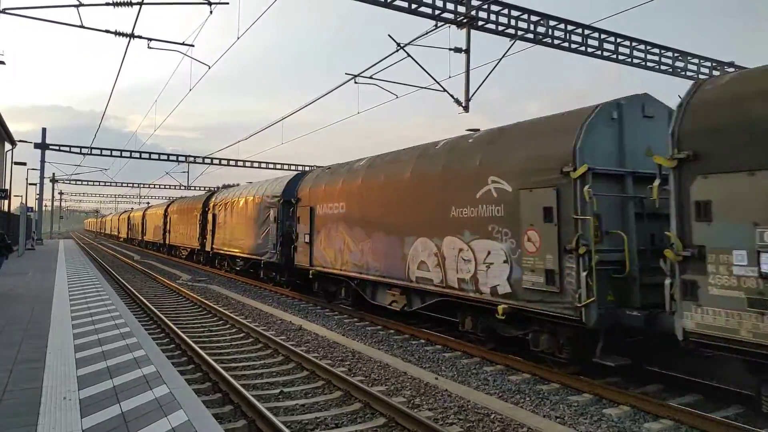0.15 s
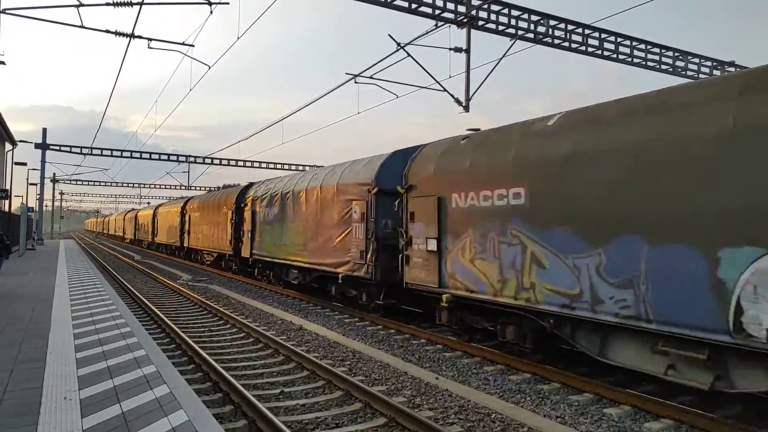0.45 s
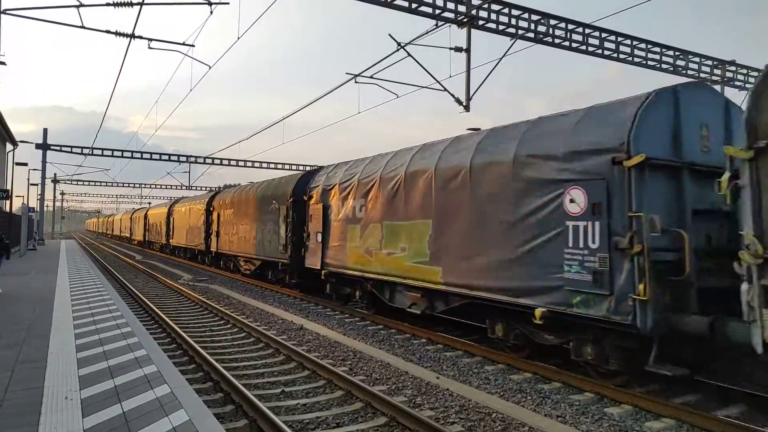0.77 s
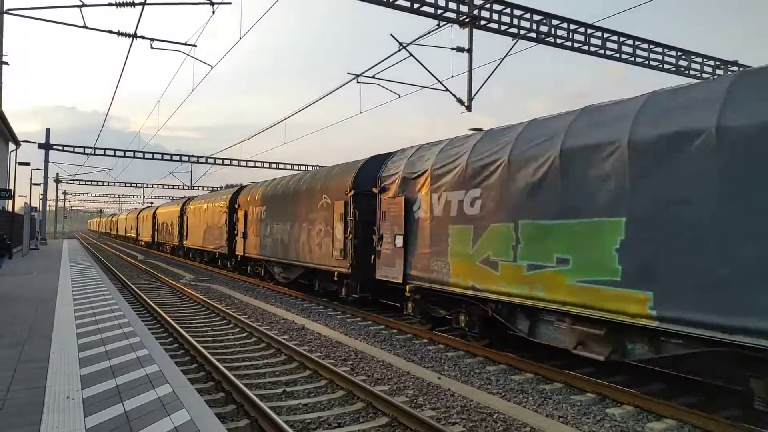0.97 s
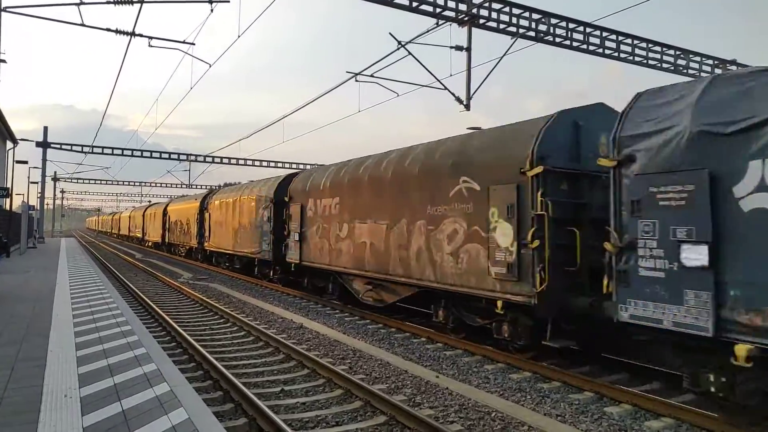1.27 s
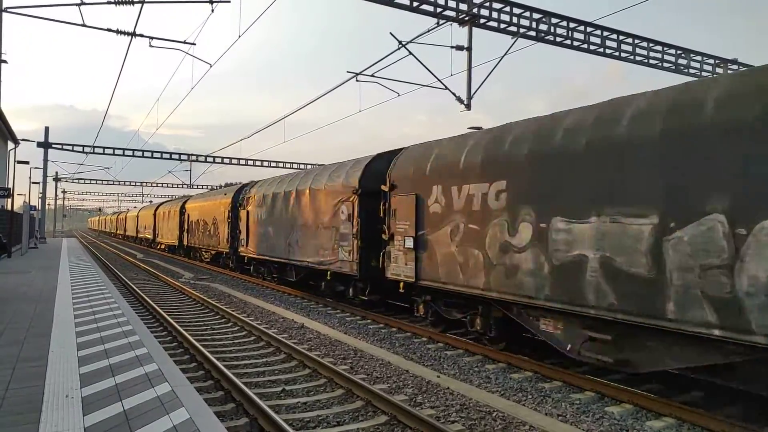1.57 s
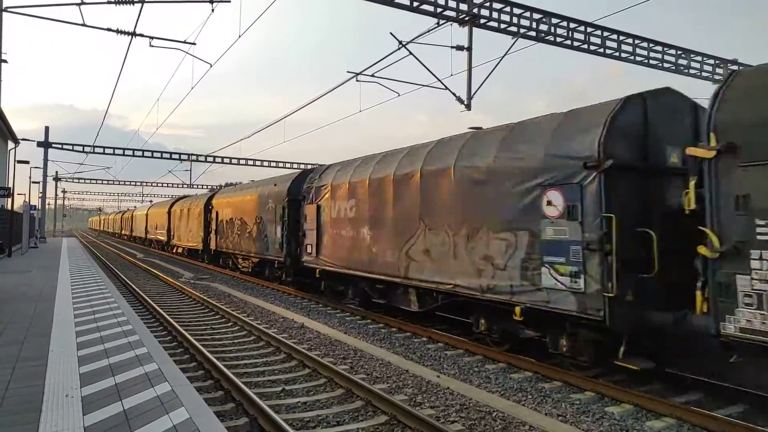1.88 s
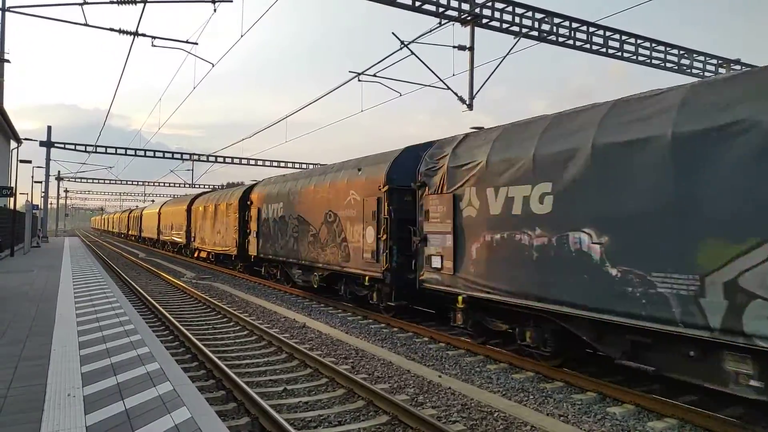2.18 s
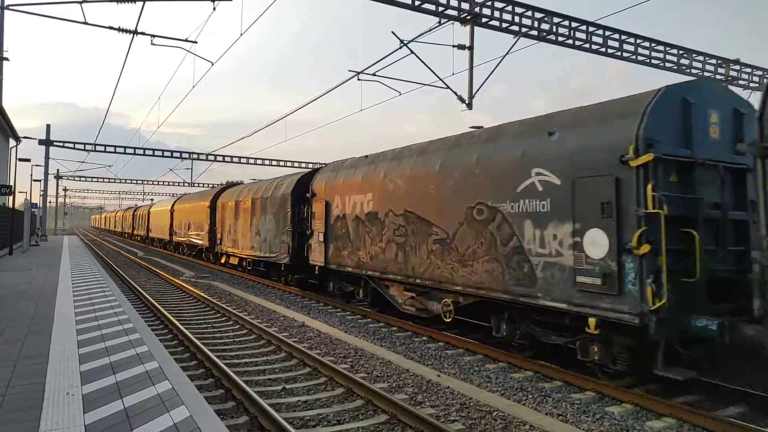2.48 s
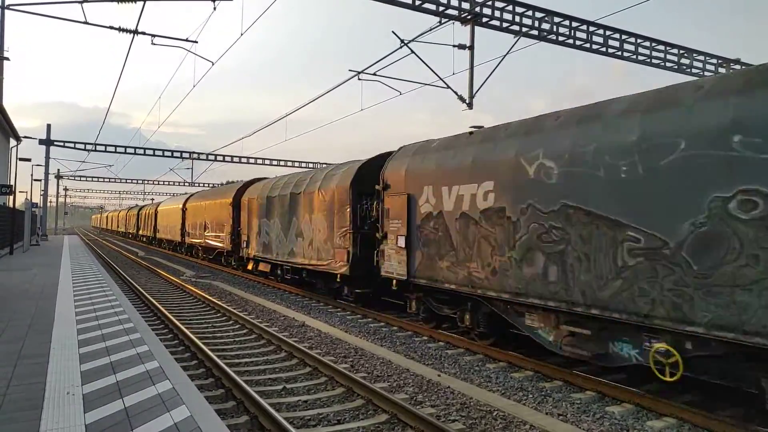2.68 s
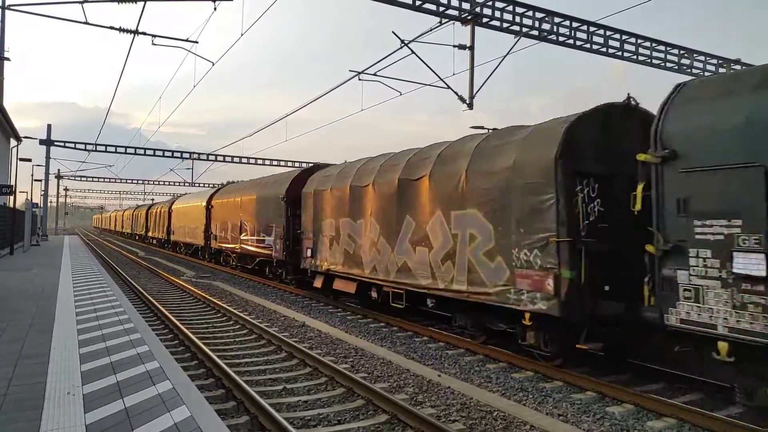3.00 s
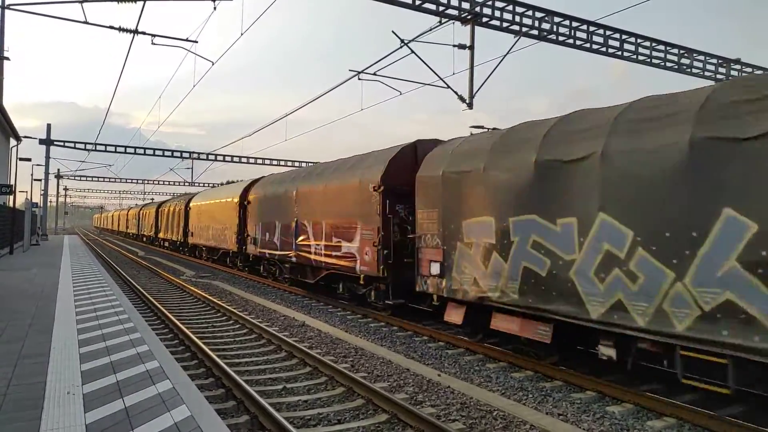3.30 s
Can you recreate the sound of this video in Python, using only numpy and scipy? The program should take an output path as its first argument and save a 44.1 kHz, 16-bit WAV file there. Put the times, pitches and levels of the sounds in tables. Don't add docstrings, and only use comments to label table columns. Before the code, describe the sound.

A freight train rolls past close by, rumbling densely, with a flat wheel banging rhythmically mid-pass.

```python
import sys
import numpy as np
from scipy import signal
from scipy.fft import rfft, irfft
from scipy.io import wavfile
from scipy.ndimage import uniform_filter1d

SR = 44100
rng = np.random.default_rng(int(sys.argv[2]) if len(sys.argv) > 2 else 0)


def volts(x):
    e = np.asarray(x, float) / 20
    return 10 ** e


def log_audio(samples):
    frames = np.atleast_2d(samples).T
    limited = np.clip(frames, -1, 1)
    pcm = np.round(limited * 32767).astype(np.int16)
    wavfile.write(sys.argv[1], SR, pcm)


N = 152145

# time in seconds, rolling level in dB, weight of the wagons on the rumble in dB.
ROUGHNESS = [
    (0.0, -22.5, -3.5),
    (0.66, -23, -3),
    (1.44, -21, -3.5),
    (1.69, -22.5, -6.5),
    (1.83, -22.5, -5),
    (2.7, -23.5, -6),
    (3.45, -23.5, -4),
]
# frequency in Hz, level per Hz in dB.
TRACK_COLOUR = [(25, -7.5), (60, -6.5), (105, -5.5), (200, 3), (400, -2.5), (900, -10), (2000, -11.5),
                (3000, -16.5)]
TRACK_DB, RUMBLE_FOLLOWS, RUMBLE_TOP_HZ = 5, 0.74, 680
PATCHY_DB, SHARED_DB = 2, .5
# frequency in Hz, width in Hz, level above the rolling in dB.
TRACK_RINGS = [(88.8, 6.8, -8), (163.4, 14, 0.5), (229.8, 9.1, 0.5), (300.6, 43, -15.5), (335.5, 7.2, -4.5),
               (2042, 55, -14), (2114, 130, -7.5), (4216, 150, -14)]

# time in seconds, level in dB.
SINGING_LEVEL = [(0.0, -21), (0.04, -23), (0.14, -51), (0.17, -26), (0.25, -45), (0.36, -26), (0.52, -37),
                 (0.93, -27), (0.98, -34.5), (1.04, -29.5), (1.82, -42.5), (1.86, -35), (2.15, -38.5),
                 (2.45, -32), (2.58, -54), (2.73, -32.5), (2.81, -38.5), (3.45, -40.5)]
SINGING_HZ, SINGING_WANDER_HZ = 510.6, 2.5

# start in seconds, knock peak in dB, thump per mode in dB, crash in dB, hiss in dB.
FLAT_LANDINGS = [(.004, -10, -18, -38, -20.5), (.394, -14, -24, -31.5, -28), (0.793, -13, -21, -23, -23),
                 (.914, -25, -19.5, -22, -23), (1.046, -7, -22, -17, -25),
                 (1.173, -9.5, -21.5, -14.5, -17.5), (1.304, 2, -14, -14, -19.5),
                 (1.438, -8, -18, -15.5, -12.5), (1.57, -18, -16, -23.5, -18),
                 (1.703, -27, -18, -24, -26.5), (1.85, -5, -20, -22, -22), (1.979, -32, -22, -23, -34),
                 (2.109, -38, -28, -34, -22), (2.566, -12.5, -29.5, -38, -37)]
KNOCK_LOSS_DB, KNOCK_HZ, KNOCK_WIDTH_HZ = -8, 610, 400
# rise in seconds, 60 dB decay in seconds.
SHAKE_TIMES = [
    (.004, .4),
    (.015, .45),
]
# frequency in Hz, level in dB, 60 dB decay in seconds.
THUMP_MODES = [(134.9, -13, 0.91), (161.8, -8, 0.45), (191.5, -0.5, 0.45), (229.2, -5, 0.71),
               (247, -3, 0.4), (292, -6.5, 0.34), (337, -16.5, 0.75), (399.3, -10, 0.29)]
SPREAD_S = 0.018
# frequency in Hz, level per Hz in dB.
CRASH_COLOUR = [(300, -12), (550, -3.5), (900, -4), (1500, -7.5), (2200, -9), (3200, -14)]
# frequency in Hz, level per Hz in dB.
HISS_COLOUR = [(2500, -16), (4500, -6), (7500, 0), (10000, 2), (13800, 4)]

# start in seconds, length in seconds, frequency in Hz, level in dB.
FRAME_BOOMS = [(0.423, 0.16, 182.4, -29), (0.653, 0.16, 158.9, -27.5), (0.873, 0.064, 244.5, -27),
               (1.036, 0.039, 176, -22.5), (1.2, 0.068, 182, -23.5), (1.32, .2, 171, -19),
               (1.308, 0.043, 250, -17), (1.52, 0.048, 254.2, -23), (1.592, .05, 360, -26.5),
               (1.2, 0.075, 380, -28.5), (1.342, 0.033, 310, -25), (1.064, 0.03, 410, -28.5),
               (1.7, 0.22, 232, -22), (1.71, 0.032, 337, -19.5), (1.732, 0.035, 140, -22),
               (1.846, 0.13, 150.3, -26), (1.856, 0.031, 343.5, -23.5), (1.988, 0.082, 226.3, -25.5),
               (2.2, 0.16, 226.5, -28.5), (2.415, 0.14, 222, -33), (2.628, 0.12, 208, -35),
               (3.07, .12, 223, -27)]
BOOM_RISE_S, BOOM_FALL_S, BOOM_WANDER_HZ = .012, .03, 4

# middle in seconds, length in seconds, frequency in Hz, level in dB.
FLANGE_SQUEALS = [
    (.87, .06, 11300, -28),
    (1.15, .28, 11250, -30),
    (1.33, .1, 13900, -25),
    (1.46, .12, 13600, -24),
    (1.6, .1, 13100, -23),
    (1.6, .07, 11000, -30),
    (1.6, .08, 7700, -24),
]

# frequency in Hz, share of power in step, share that reaches the left port late.
PORT_LIKENESS = [(60, .985, 0), (210, .92, .02), (330, .74, .1), (500, .48, .2), (800, .08, .35),
                 (1200, 0, .4), (2200, 0, .27), (5000, 0, .15)]
LAG_S = 0.000463
# frequency in Hz, left over right in dB.
PORT_BALANCE = [(60, -.2), (210, .5), (500, 2.8), (1800, 3.8), (3000, 0)]
# frequency in Hz, gain in dB.
LEFT_PORT = [(3000, 1.5), (4300, -0.5), (5000, 2), (7000, 2), (8200, 7), (9800, -11), (11200, -19.5),
             (15500, -29)]
# frequency in Hz, gain in dB.
RIGHT_PORT = [(3000, 1), (4300, 0.5), (4900, 3), (6500, 2), (7400, 8.5), (9000, -13), (11000, -31),
              (15500, -33.5)]
# frequency in Hz, width in Hz, left gain in dB, right gain in dB.
CASING_DIPS = [(3783, 160, -4, -7.5), (4876, 310, -2, -6), (6820, 150, -3, -1.5), (8940, 59, -6, -4),
               (9470, 150, 0, -1), (10630, 330, -9.5, -5.5)]
CLIP_TOP = .93

# frequency in Hz, step in dB.
ROUNDING_STEP = [(100, -38), (300, -30), (900, -26), (1200, -24), (4800, -24), (5600, -25.5), (8200, -26.5),
                 (8800, -32), (10600, -33), (11200, -38), (13000, -42), (15700, -45)]
STEP_FOLLOWS, STEP_WANDER_DB = .5, 1.5
# frequency in Hz, threshold in spreads of a wandering
WEAK_THRESHOLD = [(400, -12), (800, -2.4), (1150, -1.8), (2000, -2), (3000, -.8), (4900, -.55),
                  (7300, -.95), (8800, -.7), (10000, 0), (12500, -.1), (14000, 0), (15700, 1.8)]


def rms_one(x):
    return x / np.sqrt(np.mean(x ** 2) + 1e-20)


def in_time(rows):
    s, *columns = np.transpose(rows)
    return [np.interp(np.arange(N) / SR, s, c) for c in columns]


def at_hz(points, hz, column=1):
    points = np.array(points)
    return np.interp(np.log(hz), np.log(points[:, 0]), points[:, column])


def bins():
    return np.maximum(np.fft.rfftfreq(N, 1 / SR), 1)


def drift(rate_hz):
    r = np.exp(-80 * np.pi * rate_hz / SR)
    slow = signal.lfilter([1], [1, -2 * r, r * r], rng.standard_normal(N // 40 + 2002))
    slow = rms_one(slow[2000:])
    return np.interp(np.arange(N) / 40, np.arange(len(slow)), slow)


def ports():
    hz = bins()
    same, late, left, right = rfft(rng.standard_normal((4, N)))
    in_step = np.clip(at_hz(PORT_LIKENESS, hz, column=1), 0, 1)
    lagging = np.clip(at_hz(PORT_LIKENESS, hz, column=2), 0, 1)
    unrelated = np.clip(1 - in_step - lagging, 0, 1)
    delay = np.array([np.exp(-2j * np.pi * hz * LAG_S), hz ** 0])
    both = np.sqrt(in_step) * same + np.sqrt(lagging) * late * delay
    return both + np.sqrt(unrelated) * np.array([left, right])


def coloured(spectrum):
    points = [(spectrum[0][0] / 2, -50), *spectrum, (spectrum[-1][0] * 2, -50)]
    return rms_one(irfft(ports() * volts(at_hz(points, bins())), N))


def resonance(x, hz, width_hz):
    r = np.exp(-np.pi * width_hz / SR)
    poles = [1, -2 * r * np.cos(2 * np.pi * hz / SR), r * r]
    return signal.lfilter([(1 - r * r) / 2, 0, (r * r - 1) / 2], poles, x)


def tone(hz, wander_hz):
    pitch_hz = hz + wander_hz * drift(8)
    return np.sqrt(2) * np.sin(2 * np.pi * np.cumsum(pitch_hz) / SR)


def rolling():
    level_db, weight_db = in_time(ROUGHNESS)
    swing_db = level_db - level_db.mean()
    half_octave = np.log2(bins() / 20) * 2
    body = ports() * volts(at_hz(TRACK_COLOUR, bins()))
    body = body / np.std(irfft(body * (bins() < 3000), N))
    together, out = drift(16.0), 0
    for k in range(20):
        share = np.cos(np.pi / 2 * np.clip(half_octave - k, -1, 1)) ** 2
        band_hz = 20 * 2 ** (k / 2)
        low = 1 / (1 + (band_hz / RUMBLE_TOP_HZ) ** 2)
        gain_db = swing_db * (1 - low + low * RUMBLE_FOLLOWS) + low * weight_db
        gain_db = gain_db + SHARED_DB * together + PATCHY_DB * (.4 + .6 * low) * drift(7.2)
        out = out + volts(gain_db) * irfft(body * share, N)
    for hz, width_hz, db in TRACK_RINGS:
        heavy_db = weight_db * (hz < 1000) + swing_db + 0.83 * drift(2.6)
        ring = rms_one(resonance(irfft(ports(), N), hz, width_hz))
        out = out + volts(db - 10.5 + heavy_db) * ring
    return volts(level_db.mean() + TRACK_DB) * out


def singing_wheel():
    level_db = in_time(SINGING_LEVEL)[0] - 1.5
    return volts(level_db) * tone(SINGING_HZ, SINGING_WANDER_HZ) * volts([[1], [-1]])


def shaken_wagon(rows):
    age = np.maximum(np.arange(N) / SR - rows[:, :1], 0)
    out = 0
    for column, colour, (rise_s, t60) in zip((3, 4), (CRASH_COLOUR, HISS_COLOUR), SHAKE_TIMES):
        shake = volts(rows[:, column, None] - 60 * age / t60) * (1 - np.exp(-age / rise_s))
        out = out + np.sqrt(np.sum(shake ** 2, axis=0)) * coloured(colour)
    return out


def struck_track(rows, at):
    chance = rng.standard_normal((len(rows), len(THUMP_MODES)))
    out = 0
    for k, (hz, db, t60) in enumerate(THUMP_MODES):
        late = int(SPREAD_S * SR * (k * 3 % 8 / 8))
        blows = np.full(N, 1e-18)
        blows[at + late] = volts(rows[:, 2] + db + 1.9 * chance[:, k]) * (-1) ** k
        r, w = volts(-60 / (t60 * SR)), 2 * np.pi * hz / SR
        out = out + signal.lfilter([0, np.sin(w)], [1, -2 * r * np.cos(w), r * r], blows)
    return out


def wheel_knock(rows, at):
    knock = np.full(N, 1e-18)
    knock[at] = volts(rows[:, 1] + KNOCK_LOSS_DB)
    for _ in range(2):
        knock = resonance(knock, KNOCK_HZ, KNOCK_WIDTH_HZ)
    knock = knock * SR / KNOCK_WIDTH_HZ
    return np.array([np.roll(knock, int(LAG_S * SR)), knock])


def flat_wheel():
    rows = np.array(FLAT_LANDINGS)
    at = (rows[:, 0] * SR).astype(int)
    return shaken_wagon(rows) + struck_track(rows, at) + wheel_knock(rows, at)


def booms():
    t, out = np.arange(N) / SR, 0
    for s, length, hz, db in FRAME_BOOMS:
        rise = 1 - np.exp(-np.maximum(t - s, 0) / BOOM_RISE_S)
        fall = np.exp(-np.maximum(t - s - length, 0) / BOOM_FALL_S)
        out = out + volts(db + 1.2 * drift(10)) * rise * fall * tone(hz, BOOM_WANDER_HZ)
    return out


def squeals():
    t, out = np.arange(N) / SR, 0
    for middle, length, hz, db in FLANGE_SQUEALS:
        swell = np.exp(-((t - middle) / length * 2) ** 2)
        rub = resonance(resonance(rng.standard_normal(N), hz, 320), hz, 350)
        out = out + volts(db) * swell * rms_one(rub)
    return out * volts([[0], [-6]])


def scene():
    return rolling() + singing_wheel() + flat_wheel() + booms() + squeals()


def blur(x, size):
    return uniform_filter1d(uniform_filter1d(x, size=size[0], axis=-2), size=size[1], axis=-1)


def weak(z):
    field = 0
    for size in ((3, 4), (3, 10)):
        field = field + rms_one(blur(rng.standard_normal(z.shape[1:]), size)) / np.sqrt(2)
    near = blur(z ** 2, (2, 5)) + 1e-14
    around = blur(np.mean(z ** 2, axis=0), (7, 57)) + 1e-14
    below_db = 10 * np.log10(near / around)
    return field + below_db / 4 < at_hz(WEAK_THRESHOLD, (np.arange(1024) + .5) * SR / 2048)


def round_coarse(x):
    n, k = np.arange(2048) + .5, np.arange(1024) + .5
    basis = np.cos(np.pi / 1024 * np.outer(n + 512, k)) / np.sqrt(512)
    turn = np.array([[1, 1], [1, -1]])
    hops = np.pad(turn @ x / 2, ((0, 0), (1496, 2048 - (N + 472) % 1024))).reshape(2, -1, 1024)
    bell = np.kaiser(1025, 4 * np.pi)
    slopes = np.array([np.sin(np.pi * n[:1024] / 2048), np.sqrt(np.cumsum(bell)[:-1] / bell.sum())])
    slope = slopes[1 * (uniform_filter1d(rng.random(hops.shape[1]), size=2) > .525)]
    window = np.concatenate([slope[:-1], slope[1:, ::-1]], axis=1)
    z = np.concatenate([hops[:, :-1], hops[:, 1:]], axis=2) * window @ basis
    loud_db = 10 * np.log10(np.mean(z[:, :, 100:400] ** 2, axis=(0, 2)) + 1e-9)
    follow_db = STEP_FOLLOWS * (loud_db - np.median(loud_db))[:, None]
    wander = np.repeat(rng.standard_normal((len(window), 64)), 16, axis=1)
    step = volts(at_hz(ROUNDING_STEP, k * SR / 2048) + follow_db + STEP_WANDER_DB * wander)
    size = np.floor((np.abs(z) / step) ** .75 + .4054) ** (4 / 3)
    z = ~weak(z) * np.sign(z) * step * size
    frames = z @ basis.T * window
    lapped = frames[:, :-1, 1024:] + frames[:, 1:, :1024]
    return turn @ lapped.reshape(2, -1)[:, 472:472 + N]


def top_cut(x):
    return signal.sosfilt(signal.butter(12, 15650, fs=SR, output="sos"), x)


def record(dry):
    hz = bins()
    db = np.array([at_hz(LEFT_PORT, hz), at_hz(RIGHT_PORT, hz)])
    db = db + at_hz(PORT_BALANCE, hz) * [[.5], [-.5]]
    for dip_hz, width_hz, *depth_db in CASING_DIPS:
        db = db + np.outer(depth_db, np.exp(-((hz - dip_hz) / width_hz) ** 2))
    heard = irfft(rfft(dry) * volts(db), N)
    soft = CLIP_TOP * np.tanh(heard / CLIP_TOP)
    mix = round_coarse(soft)
    return top_cut(mix)


dry = scene()
out = record(dry)
log_audio(out)
```